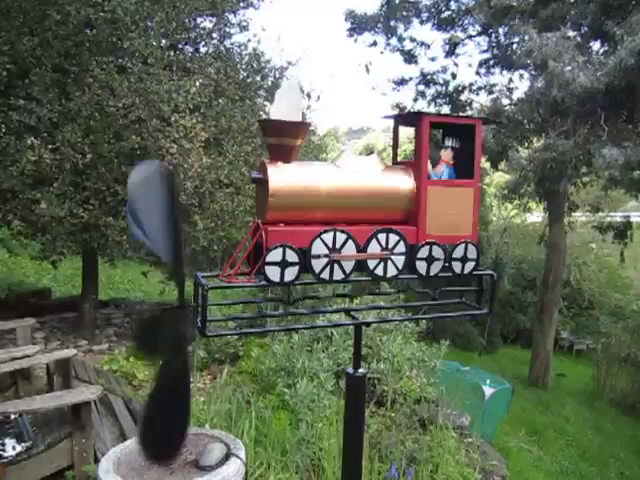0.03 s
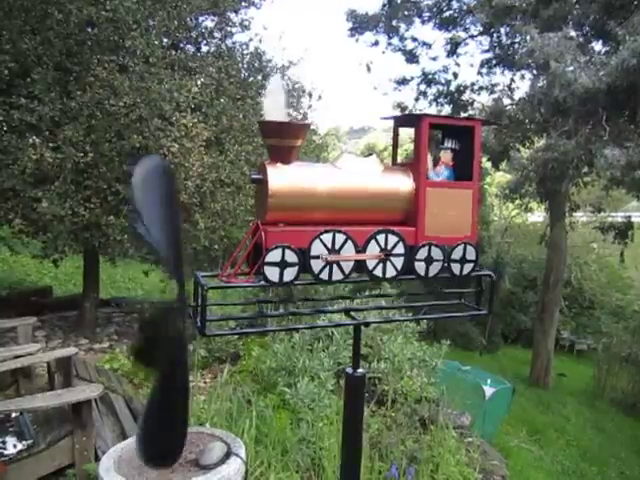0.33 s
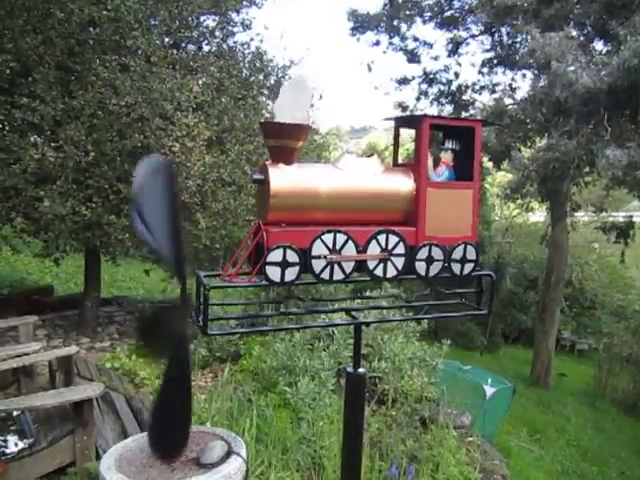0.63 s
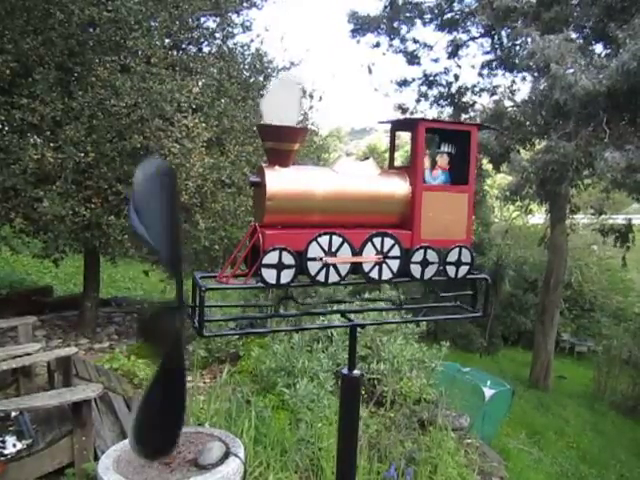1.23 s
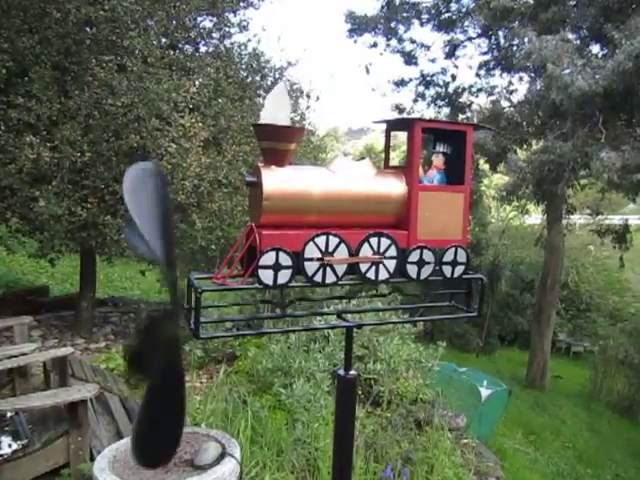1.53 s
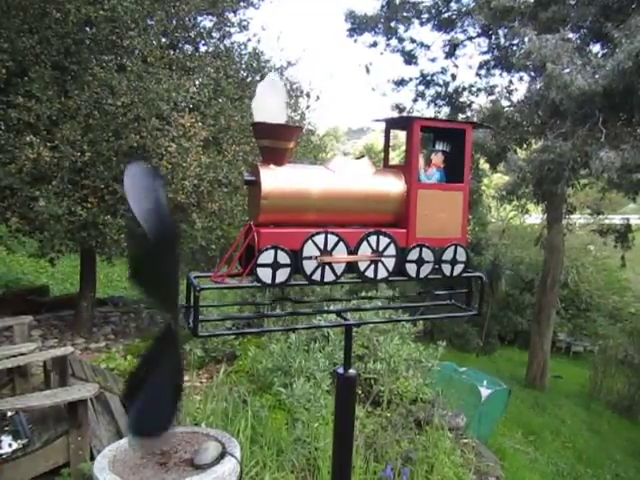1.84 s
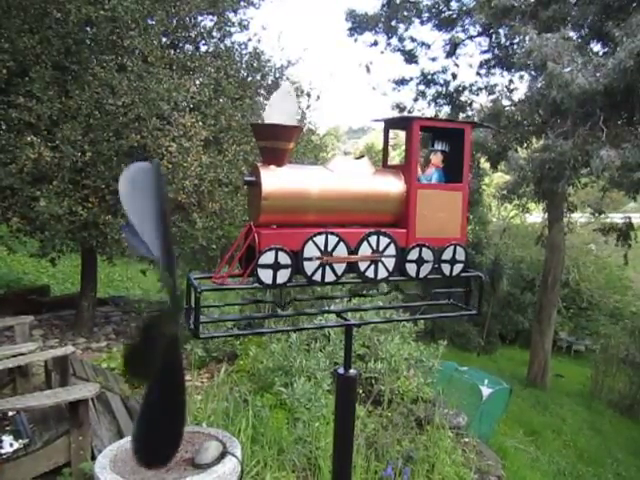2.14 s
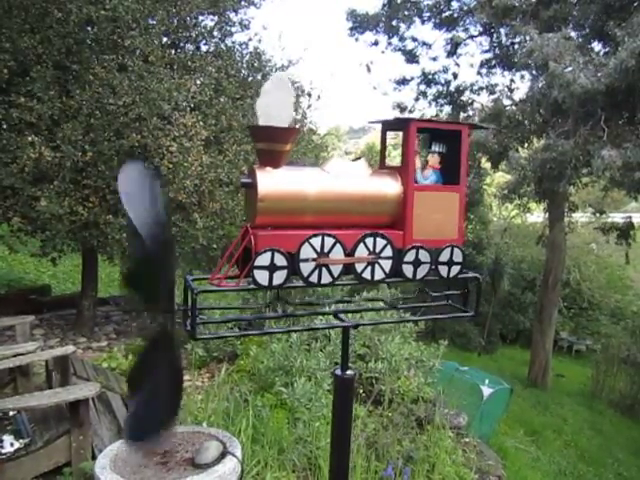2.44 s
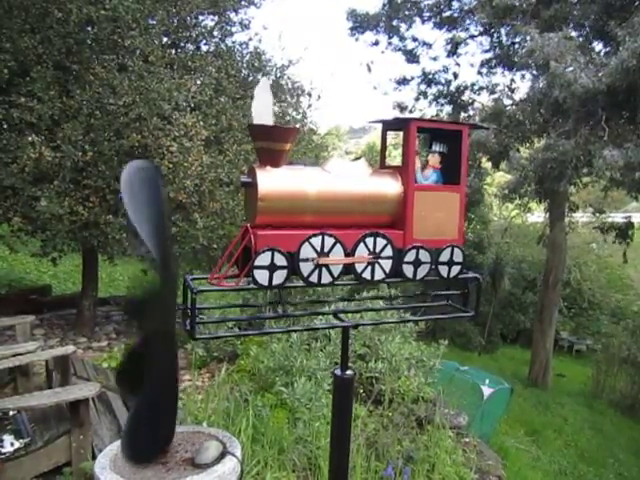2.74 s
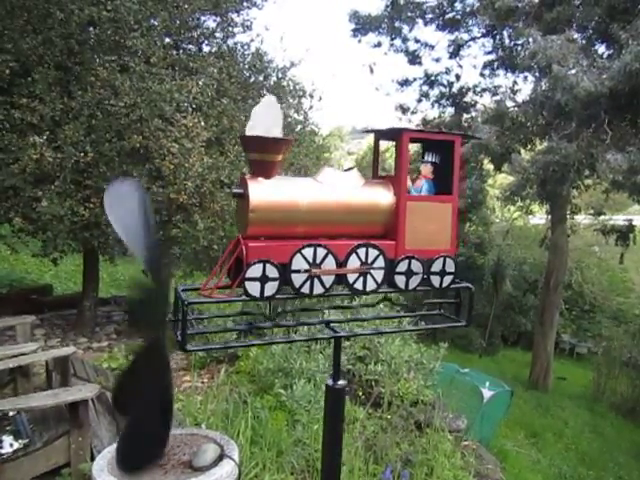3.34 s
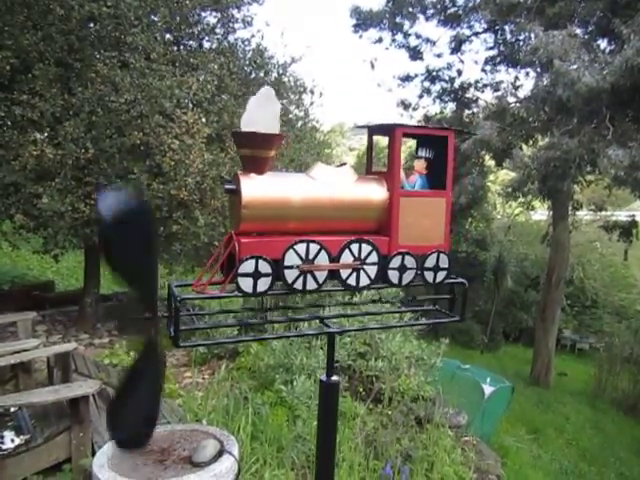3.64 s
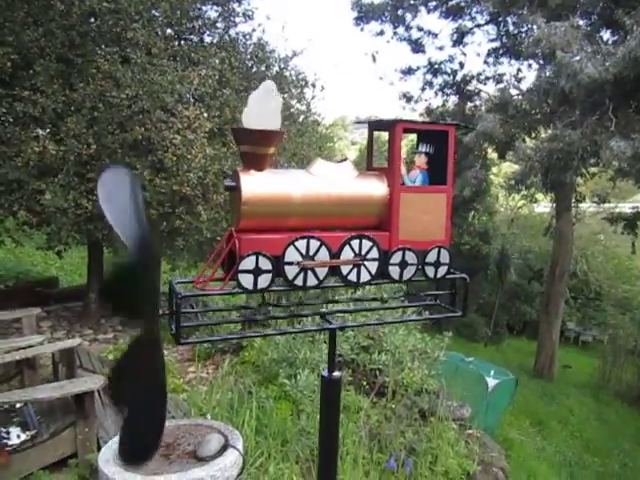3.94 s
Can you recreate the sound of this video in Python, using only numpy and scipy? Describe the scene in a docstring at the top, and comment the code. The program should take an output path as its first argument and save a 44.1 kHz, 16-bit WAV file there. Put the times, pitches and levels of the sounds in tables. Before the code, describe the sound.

Quick, ringing metal clacks come from a whirligig turning close to the microphone in a garden. Wheels scrape, bearings rattle and the propeller hums softly as the rhythm eases, with brief wind bumps near the start and end.

```python
"""In a garden, close to the microphone, a toy locomotive whirligig turns and slows as the breeze drops.
Once a turn its drive rod clacks, bounces back and rings the metal frame.
Between clacks the wheels and rods scrape, loose links tick and the bearings rattle.
The propeller blades make a low hum, and a few gusts buffet the microphone."""
import sys
import numpy as np
from scipy import signal
from scipy.fft import rfft, irfft, next_fast_len
from scipy.io import wavfile
from scipy.ndimage import uniform_filter1d, map_coordinates

SR = 44100
rng = np.random.default_rng(int(sys.argv[2]) if len(sys.argv) > 2 else 0)


def log_audio(samples):
    """Write samples as a 16-bit WAV file to the path given in sys.argv[1]."""
    # one column per channel
    frames = np.atleast_2d(samples).T
    # limit to full scale, then quantise
    limited = np.clip(frames, -1, 1)
    pcm = np.round(limited * 32767).astype(np.int16)
    wavfile.write(sys.argv[1], SR, pcm)


N = 176400

# one clack a turn: (time [s], level [dB], bounce delay [s], bounce vs clack [dB], thin ring [dB])
CLACKS = [(0.195, 1.5, 0.005, 0.5, -14.5), (.389, 2.5, .019, -3.5, -23), (.572, 3, 0.016, -4.5, -9),
          (0.762, -1.5, 0.0096, 2, -24), (0.941, 3, 0.013, -4.5, -23), (1.135, 0.5, 0.02, 0.5, -31),
          (1.319, -3.5, .0075, 6, -22), (1.511, -3, 0.013, 1.5, -26), (1.703, 2, .011, -0.5, -19),
          (1.904, -0.5, 0.012, 1, -24), (2.0992, 2.5, 0.0072, -5.5, -21.5), (2.3215, -9.5, .008, 9, -30),
          (2.549, -1.5, 0.006, -1.5, -24), (2.798, -1, 0.016, -2.5, -23), (3.0547, 0, 0.0082, 1, -39),
          (3.302, 2.5, 0.025, -5, -21), (3.570, 1, 0.012, -2.5, -23), (3.840, 4, 0.0085, -13, -18.5)]
# high notes that clacks ring but knocks do not: (pitch [Hz], level [dB])
BRIGHT_NOTES = [(6400, -46.5), (7720, -41), (8620, -34), (9600, -26.5), (10930, -34.5), (11400, -31.5),
                (13000, -34), (13520, -32.5)]
# lighter knocks just before a clack: (time [s], level [dB])
KNOCKS = [(0.171, 5.5), (0.3631, 1), (.548, -3.5), (0.737, -3.5), (1.293, 0), (1.489, -10), (1.678, 0.5),
          (1.88, -11), (2.076, -3.5), (2.288, -8), (2.758, 0.5), (3.525, -6.5)]
def drive_rod():
    """The loose rod catches: often a knock, then a clack, a bounce and a thin, high ring."""
    tones, noise, t = np.zeros(N), np.zeros(N), np.arange(SR // 4) / SR
    thin_hz, rise_s = 5314, 0.011
    thin_ring = 2 * np.sin(2 * np.pi * thin_hz * t) * fade(t, fade_s=0.069) * (1 - np.exp(-t / rise_s))
    bright_fade_s, bounce_rod_db = 0.038, -3
    bright = [(hz, db, bright_fade_s) for hz, db in BRIGHT_NOTES]
    for start, db, delay, bounce_db, ring_db in CLACKS:
        for at, hit_db, rod_db in ((start, db, 0), (start + delay, db + bounce_db, bounce_rod_db)):
            add(tones, at, amp(hit_db) * (amp(rod_db) * rod_ring() + frame_ring() + ringing(bright)))
            add(tones, at, amp(hit_db + rod_db) * crack())
            add(noise, at, amp(hit_db - 22) * clatter())
        add(tones, start + delay, amp(ring_db) * thin_ring)
    for start, db in KNOCKS:
        add(tones, start, amp(db) * (rod_ring(fade_scale=0.75) + amp(-4) * frame_ring()))
        add(noise, start, amp(db - 26) * clatter())
    return tones, noise


# the rod's own notes: (pitch [Hz], level [dB], time to fade by 60 dB [s])
ROD_NOTES = [(2652, -21, 0.05), (2735, -14.5, 0.052), (4140, -21.5, 0.048)]
def rod_ring(fade_scale=1):
    """The struck rod gives a short, high ping."""
    return ringing([(hz, db, fade_scale * fade_s) for hz, db, fade_s in ROD_NOTES])


# the frame's own notes: (pitch [Hz], level [dB], time to fade by 60 dB [s])
FRAME_NOTES = [(683.6, -40, 0.3), (712.5, -39.5, 0.26), (957, -38.5, 0.41), (1020, -45.5, 0.37),
               (1515, -27.5, .18), (1618, -30.5, 0.12), (1637, -27.5, 0.091), (1730, -27.5, 0.076),
               (1837, -34, 0.38), (2020, -50.5, 0.32), (2267, -30, 0.17), (3580, -33, .19),
               (3750, -36, 0.12), (4100, -29.5, 0.094)]
def frame_ring():
    """The metal frame rings on, longest in its low notes."""
    return ringing(FRAME_NOTES)


# tone colour of the snap: (frequency [Hz], relative level [dB])
CRACK_COLOUR = [(1200, -32), (2000, 14), (4300, -3.5), (5200, -16), (16000, -21)]
def crack():
    """Metal meets metal with a brief snap."""
    t = np.arange(SR // 20) / SR
    return amp(-21) * coloured(rng.standard_normal(len(t)), CRACK_COLOUR) * fade(t, fade_s=0.018)


# tone colour of the sheet metal: (frequency [Hz], relative level [dB])
CLATTER_COLOUR = [(200, -9), (600, -8.5), (1200, 0.5), (1700, 1), (1930, -14), (2250, 2), (2750, 11.5),
                  (3300, -4.5), (4900, -2.5), (7000, -1.5), (9600, 0.5), (11500, -2), (13400, -8.5),
                  (14400, -13), (17000, -48)]
# how long each band of it rings: (frequency [Hz], time to fade by 60 dB [s])
CLATTER_FADES = [(500, 0.34), (2000, 0.14), (5000, 0.16), (12000, 0.064)]
def clatter():
    """The sheet metal's many short notes blur into noise, the highest dying first."""
    t = np.arange(SR // 4) / SR
    spectrum = rfft(coloured(rng.standard_normal(len(t)), CLATTER_COLOUR))
    hz = np.fft.rfftfreq(len(t), 1 / SR)
    centres, fades = np.transpose(CLATTER_FADES)
    bands = [irfft(spectrum * np.interp(hz, centres, pick), len(t)) for pick in np.eye(len(centres))]
    return sum(band * fade(t, fade_s) for band, fade_s in zip(bands, fades))


# short rubs: (time [s], length [s], level [dB])
SCRAPES = [(0.036, 0.017, -25.5), (0.096, 0.016, -25.5), (0.131, 0.018, -23.5), (0.317, 0.02, -26.5),
           (0.467, 0.033, -29), (0.514, 0.016, -23.5), (0.642, 0.036, -30), (0.71, 0.02, -31),
           (0.814, 0.042, -33.5), (0.882, 0.014, -27.5), (1.018, 0.035, -31.5), (1.174, 0.052, -30),
           (1.259, 0.016, -27), (1.299, 0.016, -30.5), (1.409, 0.016, -31), (1.462, 0.0073, -27.5),
           (1.561, 0.0097, -27.5), (1.642, 0.011, -24.5), (1.76, 0.065, -34), (1.839, 0.0059, -22.5),
           (1.954, 0.023, -30), (1.99, 0.027, -32.5), (2.043, 0.017, -23.5), (2.218, 0.015, -32),
           (2.253, 0.0082, -30.5), (2.42, 0.032, -35.5), (2.736, 0.017, -34.5), (2.853, 0.02, -34),
           (2.897, 0.056, -32), (3.004, 0.0058, -29), (3.167, 0.0099, -29), (3.426, 0.015, -33),
           (3.683, 0.023, -34.5), (3.889, 0.011, -28.5), (3.952, 0.034, -35)]
# their tone colour: (frequency [Hz], relative level [dB])
SCRAPE_COLOUR = [(300, -8.5), (900, -5.5), (1700, -0.5), (2750, 7.5), (3200, -3), (4400, 4), (5500, 3),
                 (8000, -3), (11000, -4.5), (13500, -14.5), (16500, -30)]
def scrapes():
    """Wheels and rods rub in short, chattering strokes."""
    strokes, t = np.zeros(N), np.arange(SR // 4) / SR
    rise = np.minimum(t / 0.003, 1)
    for start, length, db in SCRAPES:
        add(strokes, start, amp(db) * rise * fade(np.maximum(t - length, 0), fade_s=0.045))
    chatter = amp(2.3 * wobble(per_s=150))
    return friction(strokes * chatter, SCRAPE_COLOUR, bumps_per_s=3000, ring_db=-3.5) + clinks(strokes)


TOP_HZ = 17000
def clinks(strokes):
    """Small loose parts touch during the scrapes, each with a brief note of its own."""
    out, t = np.zeros(N), np.arange(SR // 20) / SR
    middle_hz, per_s = 5474, 260
    count = int(per_s * N / SR)
    for at, (pitch, size) in zip(rng.integers(N, size=count), rng.standard_normal((count, 2))):
        hz = min(middle_hz * np.exp(0.4 * pitch), TOP_HZ)
        strength = 2 * strokes[at] * min(1, middle_hz / hz) * amp(-5 + 2 * size)
        add(out, at / SR, strength * fade(t, fade_s=0.018) * np.sin(2 * np.pi * hz * t))
    return out


# ticks of the links: (time [s], level [dB])
TICKS = [(1.2237, -27), (1.3858, -27), (1.6044, -26.5), (2.202, -31), (2.509, -38), (2.6265, -28),
         (2.742, -43), (2.8495, -44), (2.945, -43), (3.148, -34), (3.2334, -30.5), (3.2756, -31),
         (3.4796, -33), (3.6667, -51), (3.7764, -37)]
def loose_links():
    """Each tick rings a small part with its own cluster of short, high notes."""
    out = np.zeros(N)
    count, db_per_octave, fade_s = 60, -3.5, 0.055
    for start, db in TICKS:
        pitches = rng.uniform(2200, 13500, count)
        notes = [(hz, db + db_per_octave * np.log2(hz / pitches.mean()), fade_s) for hz in pitches]
        add(out, start, ringing(notes) * np.sqrt(2 / count))
    return out


# how strong the rattle is: (time [s], level [dB])
RATTLE_LEVELS = [(0, -23.5), (.5, -31), (1.03, -30.5), (1.11, -33.5), (1.95, -32.5), (2.38, -36.5),
                 (2.49, -38), (2.6, -35), (2.72, -37.5), (2.77, -38), (3.3, -33), (4, -36)]
# its tone colour: (frequency [Hz], relative level [dB])
RATTLE_COLOUR = [(150, -14.5), (350, -12.5), (600, -7.5), (850, -6.5), (1000, -1.5), (1350, 1), (1440, -15),
                 (1650, 6.5), (1850, -4.5), (2250, -3.5), (2750, -1.5), (3150, -4), (4600, -5.5),
                 (6500, -11.5), (10500, -21), (14000, -30), (17000, -45)]
def bearings():
    """The loose bearings rattle unevenly all the time."""
    db, = curves(RATTLE_LEVELS)
    flutter_db = 1.3 * wobble(per_s=45) + 2.4 * wobble(per_s=220)
    return friction(amp(db + flutter_db), RATTLE_COLOUR, bumps_per_s=3500, ring_db=-5.5)


# the propeller's spin: (time [s], blade passes [Hz], hum level [dB])
SPIN = [(0, 51.7, -31), (.15, 51.7, -31), (.3, 52, -40), (.55, 53, -35), (1.1, 53.3, -38), (1.55, 52, -42),
        (2.1, 48.5, -49), (2.65, 45, -50), (3.0, 44.3, -43), (3.35, 45.3, -39), (3.65, 46.5, -35),
        (4, 46, -36)]
# tone colour of the swish: (frequency [Hz], relative level [dB])
SWISH_COLOUR = [(100, -42), (200, -11), (260, 3), (310, -25), (450, -54), (2000, -70)]
def propeller():
    """Passing blades make a low hum with a weak octave, and a swish that grows with their speed."""
    hz, db = curves(SPIN)
    phase = 2 * np.pi * np.cumsum(hz) / SR
    hum = amp(db + 0.7 * wobble(per_s=36)) * unit(np.sin(phase) + amp(-16) * np.sin(2 * phase))
    swish = amp(-53 + 0.6 * (hz - 50)) * coloured(rng.standard_normal(N), SWISH_COLOUR)
    return hum + swish


# gusts: (time of peak [s], time to swell or die down [s], level [dB])
GUSTS = [(0.368, 0.017, -18.5), (0.436, 0.02, -27), (1.922, 0.013, -32.5), (2.75, 0.022, -34),
         (3.786, 0.3, -32), (3.995, 0.0083, -10)]
# single swirls of air: (time [s], half length [s], level [dB])
SWIRLS = [(.3645, .0028, -15), (3.743, .0025, -15), (3.824, .0045, -14)]
# tone colours of the gusts and of the soft rush: (frequency [Hz], relative level [dB])
GUST_COLOUR = [(20, -19), (45, 11), (90, -8.5), (200, -5.5), (300, -11.5), (700, -28), (1500, -53),
               (4000, -90)]
AIR_COLOUR = [(20, -45), (45, 8), (75, 3.5), (110, -4), (160, -2.5), (350, -4.5), (700, -3.5), (3000, -31),
              (16000, -60)]
def wind():
    """Air rushes softly, gusts buffet the microphone, and each swirl pulls and pushes on it once."""
    t = np.arange(N) / SR
    gusts = sum(amp(db) * np.exp(-abs(t - at) / width) for at, width, db in GUSTS)
    thumps = np.zeros(N)
    for at, width, db in SWIRLS:
        offset = (t - at) / width
        thumps += 2 * amp(db) * offset * np.exp(-offset ** 2)
    rush = amp(-45 + 2.5 * wobble(per_s=11)) * coloured(rng.standard_normal(N), AIR_COLOUR)
    return gusts * coloured(rng.standard_normal(N), GUST_COLOUR) + thumps + rush


def ringing(notes, contact_s=0.0006):
    """Struck metal's notes build up during the contact, then fade; each hit is a little different."""
    t = np.arange(SR // 4) / SR
    hz, db, fade_s = np.transpose(notes)[:, :, None]
    strength = amp(db + 2.5 * rng.standard_normal(hz.shape))
    waves = np.sin(2 * np.pi * (hz * t + rng.random(hz.shape)))
    return (1 - np.exp(-t / contact_s)) * np.sum(strength * fade(t, fade_s) * waves, 0)


def friction(strength, colour, bumps_per_s, ring_db):
    """Rubbing is many tiny bumps, heard directly and through the ringing frame and rod."""
    bumps = unit((rng.random(N) < bumps_per_s / SR) * rng.choice([-1, 1], N))
    body = frame_ring() + amp(-6) * rod_ring()
    ring = signal.fftconvolve(bumps * strength, body / np.linalg.norm(body))[:N]
    return strength * coloured(bumps, colour) + amp(ring_db) * ring


def wandering_contact(sound, depth_db=1.8):
    """The touching point wanders, so the tone colour changes from moment to moment."""
    slices = signal.stft(sound, nperseg=256)[2]
    patches = rng.standard_normal(slices.shape)
    for axis in (0, 1):  # smooth over frequency, then time
        patches = uniform_filter1d(patches, 4, axis=axis)
    return signal.istft(slices * unit(amp(depth_db * unit(patches))), nperseg=256)[1][:N]


def body_resonances(sound, depth_db=2.3, spacing_hz=60, full_above_hz=2500):
    """The toy's crowded high notes put fine, unchanging peaks and dips in the tone of its noise."""
    hz = np.fft.rfftfreq(N, 1 / SR)
    ripple = map_coordinates(rng.standard_normal(N // 100), [hz / spacing_hz], mode="wrap")
    gain = amp(depth_db * ripple * np.minimum(hz / full_above_hz, 1) ** 2)
    # build a filter that rings only after a hit, never before it
    cepstrum = irfft(np.log(unit(gain)), N)
    one_sided = np.r_[1, np.full(N // 2 - 1, 2), np.zeros(N - N // 2)]
    response = irfft(np.exp(rfft(cepstrum * one_sided)), N)[:SR // 10]
    return signal.fftconvolve(sound, response)[:N]


def amp(db):
    """Turn decibels into a multiplier."""
    return 10 ** (np.asarray(db) / 20)


def fade(t, fade_s):
    """Die away by 60 dB every fade_s seconds."""
    return amp(-60 * t / fade_s)


def unit(x):
    """Scale to an average power of 1."""
    return x / np.sqrt(np.mean(x ** 2) + 1e-20)


def curves(rows):
    """Join a table's timed points with lines, one curve for each column after the time."""
    times, *columns = np.transpose(rows)
    return [np.interp(np.arange(N) / SR, times, column) for column in columns]


def wobble(per_s):
    """A smooth curve through per_s random points a second."""
    return map_coordinates(rng.standard_normal(1024), [np.arange(N) * per_s / SR], mode="wrap")


def coloured(sound, colour):
    """Give a sound a tone colour, at an average power of 1."""
    hz = np.fft.rfftfreq(len(sound), 1 / SR)
    points_hz, points_db = np.transpose(colour)
    db = np.interp(np.log(hz + 1), np.log(points_hz + 1), points_db)
    return unit(irfft(rfft(sound) * amp(db), len(sound)))


def add(track, start_s, sound):
    """Mix a sound into the track."""
    part = track[max(0, round(start_s * SR)):][:len(sound)]
    part += sound[:len(part)]


def scene():
    """The toy and the wind at one close microphone."""
    rod_tones, rod_noise = drive_rod()
    metal_noise = body_resonances(wandering_contact(rod_noise + scrapes() + bearings()))
    return (rod_tones + metal_noise + loose_links() + propeller() + wind())[None]


def record(dry):
    """The sound opens after a moment of silence, with the very highest treble cut off."""
    opened = dry * (np.arange(N) / SR > 0.035)
    padded = next_fast_len(N + SR // 4)
    kept = np.fft.rfftfreq(padded, 1 / SR) < TOP_HZ
    return irfft(rfft(opened, padded) * kept, padded)[..., :N]


dry = scene()
out = record(dry)
log_audio(out)
```